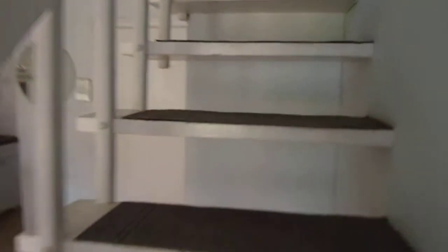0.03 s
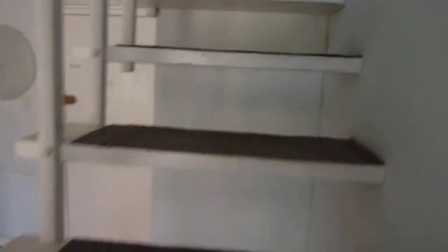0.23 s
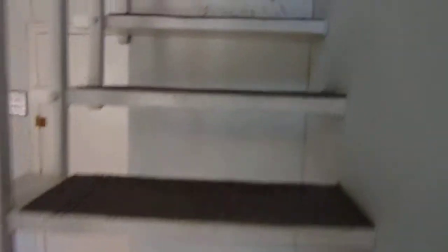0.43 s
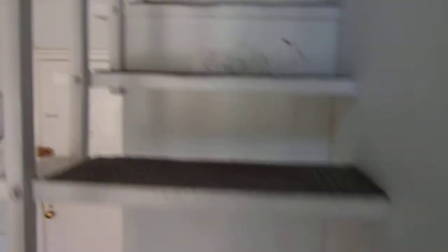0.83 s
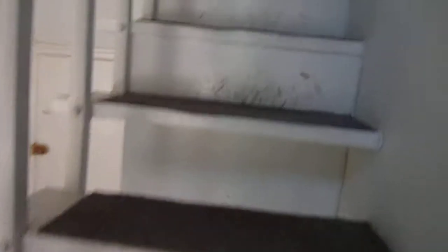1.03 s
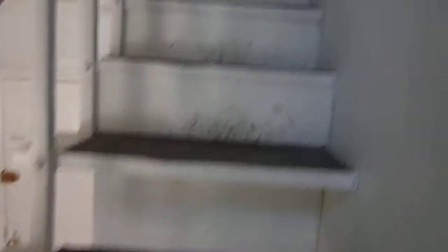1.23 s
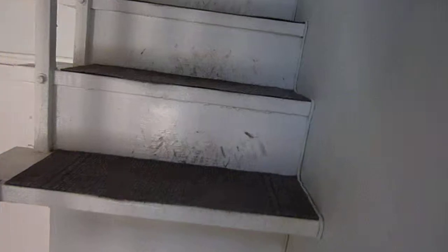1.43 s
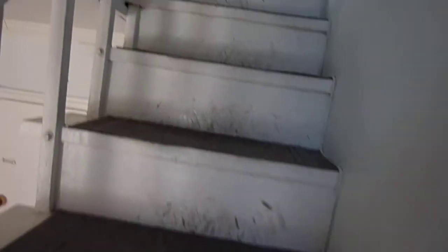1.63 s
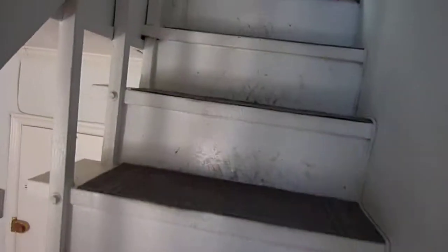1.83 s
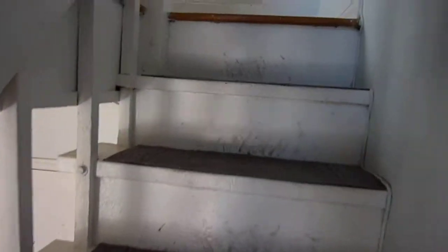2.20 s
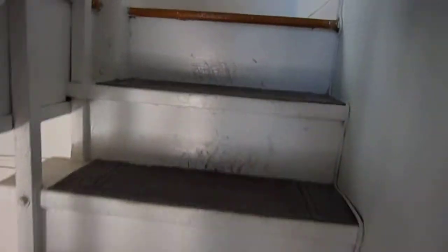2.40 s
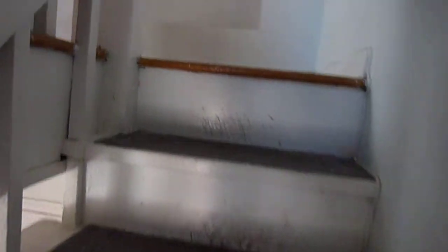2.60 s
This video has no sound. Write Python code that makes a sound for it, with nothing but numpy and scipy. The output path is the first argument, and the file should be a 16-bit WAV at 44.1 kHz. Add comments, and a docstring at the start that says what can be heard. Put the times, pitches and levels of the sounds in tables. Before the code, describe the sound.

Someone climbs wooden stairs with steady, dull footsteps, the joints cracking under the weight.

```python
"""Six footfalls climb a matted wooden staircase, close to a hand-held microphone.
Faint room noise, a low rumble and a thin whine run from the start.
Each foot thuds on a tread and pats the mat; as the weight follows, the frame booms.
From the second step soles scuff; from the third, slipping joints crack or creak and ring a loose board.
The bare stairwell rings after each of these. The rumble swells at the end."""
import sys
import numpy as np
from scipy import signal
from scipy.fft import rfft, irfft
from scipy.io import wavfile
from scipy.ndimage import uniform_filter1d

SR = 44100
rng = np.random.default_rng(int(sys.argv[2]) if len(sys.argv) > 2 else 0)


def waveform_to_disk(signal):
    """Save audio, clipped to [-1, 1], as 16-bit WAV at the path in sys.argv[1]."""
    frames = np.transpose(np.atleast_2d(signal))
    scaled = np.clip(frames, -1, 1) * 32767
    samples = np.round(scaled).astype(np.int16)
    wavfile.write(sys.argv[1], SR, samples)


N = 121275
T = np.arange(SR) / SR  # time within one event [s]

# room noise spectrum (frequency [Hz], relative density [dB])
NOISE_SPECTRUM = [(20, -31.5), (35, -8.5), (55, -0.5), (100, -9), (170, -8.5), (280, -3), (500, -10),
                  (850, -7.5), (1400, -14), (2100, -19), (2600, -22.5), (4500, -27.5), (7000, -29),
                  (9000, -33.5)]
# rumble envelope (time [s], level [dB])
RUMBLE_ENVELOPE = [(0, -77), (.12, -68), (.2, -49.5), (.32, -77), (.5, -65), (1.698, -67), (2.4, -62.5),
                   (2.72, -49)]
# footfalls (time [s], thud level [dB], tread pitch [Hz], lowest mode gain [dB], low-pass [Hz],
#            ring length [ratio], pat level [dB], thud reverb [dB])
FOOTFALLS = [(0.1037, -15, 192, 2.5, 583, 0.8, -38, -7.5), (0.5701, -20, 204.6, 7, 470, 1.2, -40.5, -8.5),
             (1.0023, -22, 202.3, -6, 517, 1.45, -45, -7), (1.4636, -19, 202, 1.5, 453, 1.33, -40, -7),
             (1.9307, -19, 178, 0, 524, 1.42, -43.5, -5), (2.3835, -25, 200, 5.5, 480, 0.68, -50.5, -6)]
# tread modes (frequency / tread pitch [ratio], gain [dB], base t60 [s])
TREAD_MODES = [(1, -1, 0.098), (1.3, 3, 0.059), (1.84, 4, 0.022), (2.06, 1, 0.024), (2.66, 1.5, 0.04),
               (3.12, -4, .04)]
# sole patting the mat (frequency [Hz], gain [dB])
PAT_SPECTRUM = [(150, -17), (600, 5.5), (1000, -6.5), (1400, -8.5), (2200, -14), (3500, -23.5), (8000, -37)]
# frame taking the weight (time [s], level [dB])
FRAME_LOADS = [(.14, -29.5), (.62, -33.5), (1.041, -27), (1.496, -30), (1.558, -20.5), (1.89, -29.5),
               (1.996, -26), (2.413, -28)]
# frame modes (frequency [Hz], gain [dB], t60 [s])
FRAME_MODES = [(77.8, -22, 0.9), (112, -13, 0.21), (139, 2, 0.13), (173.9, -1.5, 0.16), (198.9, 2, 0.07),
               (301, -2, 0.071), (364.3, -1.5, 0.044)]
# sole scuffs (time [s], level [dB], time to peak [s], reverb [dB])
SOLE_SCUFFS = [(0.571, -50.5, 0.0085, 4), (1.013, -49.5, 0.0013, 6.5), (1.045, -40, 0.0053, 4),
               (1.06, -39.5, 0.028, -1), (1.498, -38.5, 0.0031, -1), (2.008, -43, 0.0066, 9)]
# sole rubbing (frequency [Hz], gain [dB])
SCUFF_SPECTRUM = [(200, 10.5), (800, 4), (2000, 3), (3000, 2), (4200, -3.5), (5500, -10), (6800, -6.5),
                  (9000, -19.5)]
# joint cracks (snap time [s], level [dB], build-up [s], low-pass [Hz], board level [dB], reverb [dB])
JOINT_CRACKS = [(1.05, -34.5, 0.0039, 1300, -37.5, 4.5), (1.556, -21, 0.001925, 3800, -40.5, 1),
                (1.8865, -32, 0.0011, 2500, -41, 3), (1.9948, -22.5, .002, 6500, -16.5, -2.5),
                (2.013, -30.5, 0.00088, 4640, -61.5, 7.5), (2.428, -37, 0.0048, 900, -30.5, 0.5)]
# joint response (frequency [Hz], gain [dB])
JOINT_SPECTRUM = [(40, -29.5), (100, -19), (200, -6.5), (450, 2), (700, 6), (900, 0), (1100, -4.5),
                  (1500, -4), (2050, -7.5), (2600, -17.5), (4200, -19.5), (8000, -24.5)]
# loose board modes (frequency [Hz], gain [dB], t60 [s])
BOARD_MODES = [(526, -5.5, 0.1), (578, -4.5, 0.087), (643, -9.5, .08), (1134, -20.5, 0.11)]
# stairwell decay (frequency [Hz], t60 [s])
STAIRWELL_T60 = [(60, .8), (170, 0.67), (300, 0.98), (600, .8), (1200, 1), (2500, 1), (5000, 1),
                 (9000, 0.25)]
# stairwell tail spectrum (frequency [Hz], gain [dB])
STAIRWELL_SPECTRUM = [(50, 5), (120, -10), (220, -4), (400, -1.5), (700, 0), (1500, -4), (4000, -2),
                      (9000, 4.5)]
# diffuse sound at the microphone (frequency [Hz], left-right coherence [ratio])
COHERENCE = [(30, 0.98), (500, 1), (1000, 0.93), (2000, 0.67), (3500, 0.24), (6000, 0.29), (9000, .1)]


def amp(db):
    """Decibels to gain."""
    return 10 ** (np.asarray(db) / 20)


def at_level(x, db, ref_s=0.01):
    """Scale x to the energy of ref_s seconds at db."""
    return x * amp(db) * np.sqrt(ref_s * SR / (np.sum(x ** 2) + 1e-20))


def lookup(table, hz):
    """Interpolate on a log-frequency axis."""
    table_hz, values = np.transpose(table)
    return np.interp(np.log(hz + 1), np.log(table_hz + 1), values)


def add(mix, start_s, sound):
    """Mix in a stereo sound."""
    part = mix[:, max(round(start_s * SR), 0):][:, :sound.shape[1]]
    part += sound[:, :part.shape[1]]


def butter(x, hz, kind, order=2):
    """Butterworth low-pass or high-pass."""
    return signal.sosfilt(signal.butter(order, hz, kind, fs=SR, output="sos"), x)


def colour(x, spectrum, size=4096):
    """Minimum-phase filter with the given spectrum."""
    log_gain = np.log(amp(lookup(spectrum, abs(np.fft.fftfreq(size, 1 / SR)))))
    taps = np.fft.ifft(np.exp(np.conj(signal.hilbert(log_gain)))).real[:size // 2]
    return signal.fftconvolve(x, taps)[:len(x)]


def decay(t, t60_s):
    """Fall of 60 dB per t60_s."""
    return np.exp(-np.log(1000) * t / t60_s)


def ring(modes, rise_cycles, pitch=1, length=1):
    """Damped modes after one blow; low modes build more slowly."""
    return sum(amp(db) * decay(T, t60_s * length) * np.sin(2 * np.pi * freq * pitch * T)
               * (1 - np.exp(-freq * pitch * T / rise_cycles)) for freq, db, t60_s in modes)


def mic_pair(spectra, hz):
    """Blend two independent spectra into those of two close microphone ports."""
    coherence = lookup(COHERENCE, hz)[:, None]
    mid = np.sqrt((1 + coherence) / 2) * spectra[0]
    side = np.sqrt((1 - coherence) / 2) * spectra[1]
    return np.array([mid + side, mid - side])


def room_noise(db=-46, patch_db=1.86, size=2048):
    """Faint noise, slightly uneven in time and frequency."""
    hz, _, spectra = signal.stft(rng.standard_normal((2, N)), SR, nperseg=size)
    patches = uniform_filter1d(rng.standard_normal(spectra.shape[1:]), size=12, axis=0)
    patches = uniform_filter1d(patches, size=5, axis=1)
    gain = amp(lookup(NOISE_SPECTRUM, hz)[:, None] - patch_db * patches / patches.std())
    noise = signal.istft(mic_pair(spectra, hz) * gain, SR, nperseg=size)[1][:, :N]
    noise = butter(noise, 38, "high")
    return amp(db) * noise / noise.std()


def rumble(low_hz=44.2, high_hz=95):
    """Low noise band; swells after the first footfall and at the end."""
    noise = butter(rng.standard_normal(N), low_hz, "high", order=4)
    noise = butter(noise, high_hz, "low", order=4)
    level_db = np.interp(np.arange(N) / SR, *np.transpose(RUMBLE_ENVELOPE))
    return noise / noise.std() * amp(level_db)


def footfall(db, pitch_hz, lowest_db, lowpass_hz, length, pat_db, reverb_db,
             highpass_hz=162, pat_tau_s=0.013):
    """A soft blow rings the tread; the sole pats the mat."""
    lowest = ring(TREAD_MODES[:1], rise_cycles=0.3, pitch=pitch_hz, length=length)
    upper = ring(TREAD_MODES[1:], rise_cycles=0.3, pitch=pitch_hz, length=length)
    thud = butter(amp(lowest_db) * lowest + upper, lowpass_hz, "low", order=3)
    thud = butter(thud, highpass_hz, "high", order=4)
    pat = colour(rng.standard_normal(SR) * np.exp(-T / pat_tau_s), PAT_SPECTRUM)
    pat_impulse = colour(signal.unit_impulse(SR), PAT_SPECTRUM)
    return (stairwell(at_level(-thud, db), reverb_db)
            + stairwell(at_level(pat, pat_db), reverb_db=10.5, feed=pat_impulse))


def stairwell(direct, reverb_db, feed=None, delay_s=0.0033, build_s=0.0072, size=512):
    """Direct sound plus a fresh diffuse tail, reverb_db relative to it; feed, if given, drives the tail."""
    hz, t, spectra = signal.stft(rng.standard_normal((2, SR)), SR, nperseg=size)
    spectra = mic_pair(spectra, hz) * decay(t, lookup(STAIRWELL_T60, hz)[:, None])
    spectra *= amp(lookup(STAIRWELL_SPECTRUM, hz))[:, None]
    tail = signal.istft(spectra, SR, nperseg=size)[1][:, :SR]
    tail *= np.clip((T - delay_s) / build_s, 0, 1)
    wet = signal.fftconvolve((direct if feed is None else feed)[None], tail, axes=1)[:, :SR]
    return direct + amp(reverb_db) * wet * np.linalg.norm(direct) / np.linalg.norm(wet[0])


def frame_boom(db, highpass_hz=75):
    """The whole frame rings under the weight."""
    boom = butter(ring(FRAME_MODES, rise_cycles=0.65), highpass_hz, "high")
    return stairwell(at_level(boom, db), reverb_db=-2)


def sole_scuff(db, peak_s, reverb_db, grain_db=3):
    """A short, grainy rub of the sole."""
    grains = rng.standard_normal(SR) * amp(grain_db * rng.exponential(1, SR))
    envelope = (T / peak_s * np.exp(-T / peak_s)) ** 2
    rub = colour(grains * envelope, SCUFF_SPECTRUM)
    return stairwell(at_level(rub, db), reverb_db)


def joint_crack(db, build_s, lowpass_hz, board_db, reverb_db,
                slips_per_s=4000, slip_tau_s=0.0035, slips_over_snap_db=8):
    """Tiny slips lead to one snap, which rings a loose board."""
    slips = rng.standard_normal(SR) * (rng.random(SR) < slips_per_s / SR)
    slips *= np.exp(-np.maximum(T - build_s, 0) / slip_tau_s)
    snap = signal.unit_impulse(SR, round(build_s * SR))
    force = at_level(slips, slips_over_snap_db) + at_level(snap, 0)
    crack = at_level(butter(colour(force, JOINT_SPECTRUM), lowpass_hz, "low"), db)
    snap_only = at_level(butter(colour(snap, JOINT_SPECTRUM), lowpass_hz, "low"), db)
    board = at_level(signal.fftconvolve(snap, ring(BOARD_MODES, rise_cycles=1))[:SR], board_db)
    return stairwell(crack + board, reverb_db, feed=snap_only + board)


def scene():
    """The climb over room noise and rumble, in stereo."""
    mix = room_noise() + rumble()
    for time_s, *settings in FOOTFALLS:
        add(mix, time_s, footfall(*settings))
    for time_s, db in FRAME_LOADS:
        add(mix, time_s, frame_boom(db))
    for time_s, *settings in SOLE_SCUFFS:
        add(mix, time_s, sole_scuff(*settings))
    for snap_s, db, build_s, *settings in JOINT_CRACKS:
        add(mix, snap_s - build_s, joint_crack(db, build_s, *settings))
    return mix


def record(dry):
    """Microphone: narrow notch, dull top, thin whine, left side louder, band limit."""
    notch_hz, notch_width_hz = 5420, 370
    shelf_hz, shelf_db = 7756, -16
    whine_hz, whine_db = 8000, -93.5
    left_over_right_db, band_limit_hz = 1.6, 8856
    hz = np.fft.rfftfreq(2 * N, 1 / SR)
    notch = 1 - 0.75 * np.exp(-(2 * (hz - notch_hz) / notch_width_hz) ** 2)
    shelf = amp(shelf_db * (1 + np.tanh((hz - shelf_hz) / 300)) / 2)
    filtered = irfft(rfft(dry, 2 * N) * notch * shelf)[:, :N]
    whine = amp(whine_db) * np.sin(2 * np.pi * whine_hz * np.arange(N) / SR)
    balance = amp([[left_over_right_db / 2], [-left_over_right_db / 2]])
    lowpass = signal.firwin(301, band_limit_hz, window=("kaiser", 9), fs=SR)
    return signal.oaconvolve((filtered + whine) * balance, lowpass[None], "same")


dry = scene()
out = record(dry)
waveform_to_disk(out)
```